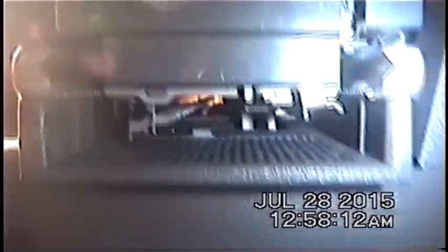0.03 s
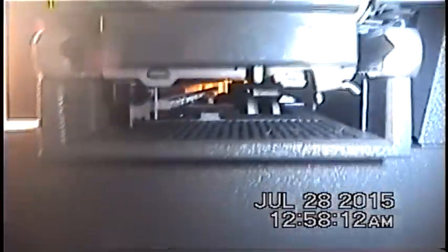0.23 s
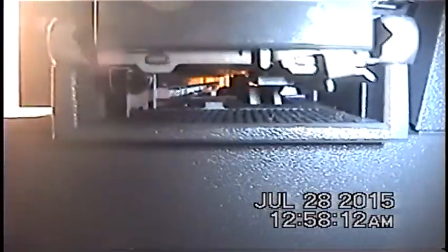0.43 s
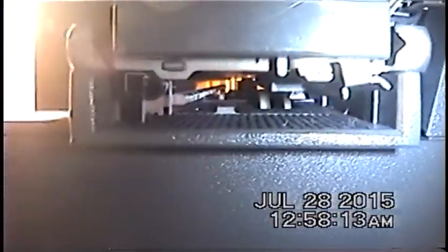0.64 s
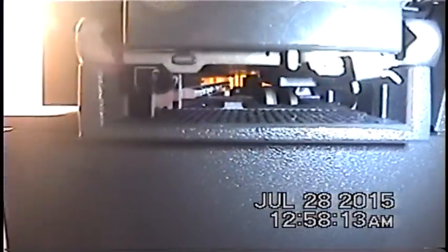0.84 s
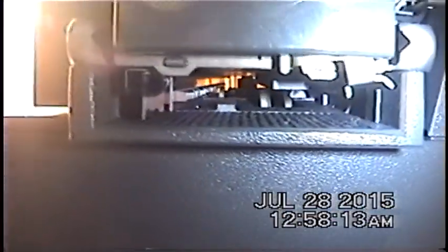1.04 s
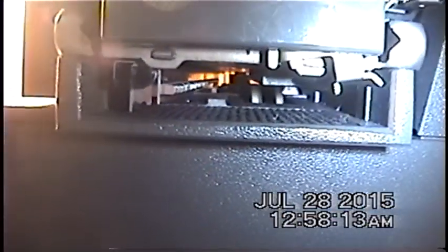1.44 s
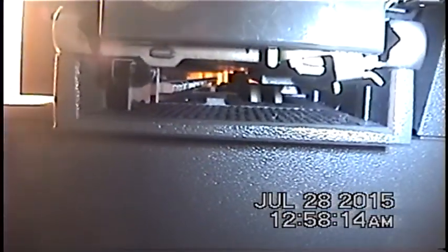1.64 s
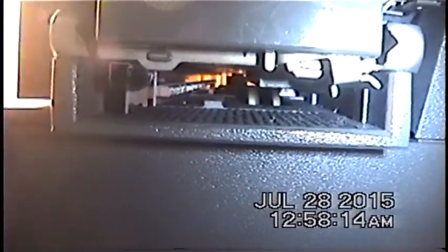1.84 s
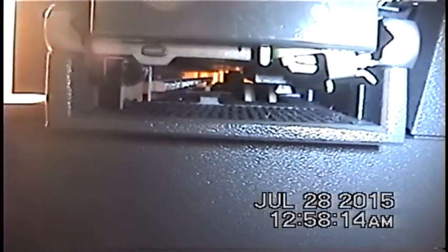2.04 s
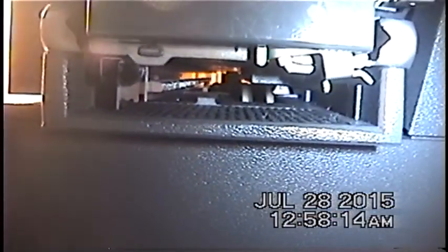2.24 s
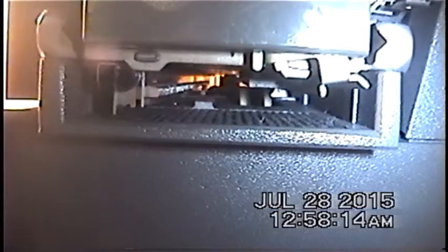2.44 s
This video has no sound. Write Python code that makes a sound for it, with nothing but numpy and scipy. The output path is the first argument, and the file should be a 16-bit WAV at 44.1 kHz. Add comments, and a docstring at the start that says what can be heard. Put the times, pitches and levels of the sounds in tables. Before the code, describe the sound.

A manual typewriter's carriage rattles, rings its bright bell and clacks to a stop.

```python
"""A manual typewriter's carriage rattles along, very close, trips the bell and clacks to a stop.
The steel bell rings on over a knock and a lever's tick. Its first quarter second overloads the camera's
treble-boosted sound channel, which adds sum and difference tones.
The camera's motor hums and whirrs underneath."""
import sys
import numpy as np
from scipy import signal
from scipy.fft import rfft, irfft
from scipy.io import wavfile
from scipy.ndimage import uniform_filter1d

SR = 44100
rng = np.random.default_rng(int(sys.argv[2]) if len(sys.argv) > 2 else 0)


def dump(signal):
    """Clip the signal to [-1, 1] and save it as 16-bit WAV at the path in sys.argv[1]."""
    limited = np.clip(np.atleast_2d(signal).T, -1, 1)
    pcm = np.round(limited * 32767).astype(np.int16)
    wavfile.write(sys.argv[1], SR, pcm)


N = 110250


def carriage():
    """Metal parts strike the frame and ring its modes, over the rail's scrape and a faint low ring."""
    # Each row: start in s, level in dB, treble tilt in dB/octave, t60 in s, ring in dB re the blow.
    clacks = [(.039, -41.5, -6, 0.092, -2.5), (.075, -28, -1.5, 0.037, -3), (.078, -31.5, -1.5, 0.058, 9),
              (.116, -39.5, -5.5, 0.04, 4), (0.1483, -37, -4, .1, 0), (0.167, -32.5, -4, .08, 1),
              (0.1833, -28, -3.5, 0.047, 1), (0.194, -34.5, 0, 0.026, 3.5), (.206, -34.5, -8, 0.13, 6.5),
              (0.2198, -24.5, 2.5, 0.076, -14.5), (0.2231, -10, 2.5, 0.1, -4),
              (.235, -12.5, 4, 0.083, -0.5), (.261, -23, -4, 0.25, -6), (.477, -29, -12, 0.055, -12.5),
              (.492, -13, -1.5, 0.054, -3), (.4985, -14.5, -2.5, 0.074, 0), (.507, -10, 0.5, 0.053, -8),
              (0.5151, -16.5, 2.5, 0.11, -12.5), (0.53, -25, 0.5, .05, -6.5)]
    # Each row: frequency in Hz, relative density in dB.
    frame_colour = [(30, -8.5), (100, -10.5), (250, -6.5), (500, -7.5), (800, -10.5), (1400, -4),
                    (2400, -3), (3300, -0.5), (5000, -3), (7500, -6), (10000, -14.5), (14000, -19)]
    # Each row: frequency in Hz, relative level in dB, t60 in s.
    frame_modes = [(513, -16, 0.1), (649, -28.5, 0.21), (1259, -9.5, 0.12), (1540, -12, 0.096),
                   (2075, -8.5, 0.042), (2243, -12.5, 0.082), (2498, -5, 0.065), (3255, -12, 0.099)]
    # Each row: frequency in Hz, level in dB, t60 in s.
    faint_ring = [(440, -41.5, 0.95)]
    out = slide()
    add(out, 0, ring(faint_ring))
    for start_s, db, tilt_db, t60_s, ring_db in clacks:
        impact = blow(frame_colour, db, t60_s, tilt_db)
        add(out, start_s, impact + amp(db + ring_db) * ring(frame_modes))
    return out


def slide():
    """The carriage scrapes unevenly along its rail."""
    # Each row: frequency in Hz, relative density in dB.
    rail_colour = [(60, -8.5), (330, -0.5), (680, -4), (1000, -1.5), (1500, -3), (2400, -4), (3500, -7.5),
                   (6000, -18.5), (14000, -34.5)]
    start_s, end_s, ramp_s = 0.089, 0.47, 0.022
    level_db, rough_db = -44, 3
    t = np.arange(N) / SR
    moving = np.clip(np.minimum(t - start_s, end_s - t) / ramp_s, 0, 1)
    bumps = uniform_filter1d(rng.standard_normal(N), size=200)
    return moving * amp(level_db + rough_db * bumps / bumps.std()) * noise(rail_colour, N)


def bell():
    """A small steel gong, struck once; its second mode is a beating pair."""
    # Each entry: mode frequency in Hz.
    modes_hz = [3998, 9207, 9174, 14931]
    # Each row: that mode's level in dB, decay in dB/s.
    decays = [(-5.5, 17.5), (-6, 54.5), (-15.5, 57.5), (-13, 70)]
    start_s, rise_s = 0.2235, 0.008
    t = np.maximum(np.arange(N) / SR - start_s, 0)
    tone = sum(amp(db - db_per_s * t) * np.sin(2 * np.pi * hz * t)
               for hz, (db, db_per_s) in zip(modes_hz, decays))
    return tone * (1 - np.exp(-t / rise_s))


def pawl():
    """The escapement pawl catches twice and rings briefly."""
    # Each row: start in s, level in dB.
    catches = [(.456, -14), (0.4621, -15)]
    # Each row: frequency in Hz, relative density in dB.
    colour = [(100, -19), (800, -20), (1500, -6), (2200, -3.5), (3000, -6.5), (5000, -14.5), (7500, -20.5),
              (14000, -36.5)]
    # Each row: frequency in Hz, level in dB re the blow, t60 in s.
    modes = [(1560, -16, 0.083), (2150, 0, 0.038)]
    out = np.zeros(N)
    for start_s, db in catches:
        add(out, start_s, blow(colour, db, t60_s=0.046) + amp(db) * ring(modes))
    return out


def desk():
    """The machine's weight thumps the desk."""
    # Each row: start in s, level in dB.
    thumps = [(0.077, -39.5), (0.224, -27), (.5, -32.5)]
    # Each row: frequency in Hz, relative density in dB.
    colour = [(20, -5.5), (55, -1.5), (110, -6.5), (190, -0.5), (400, -17.5), (1500, -51), (8000, -88)]
    out = np.zeros(N)
    for start_s, db in thumps:
        add(out, start_s, blow(colour, db, t60_s=0.51, rise_s=0.0033))
    return out


def knock():
    """A dry, close knock on a hollow casing."""
    # Each row: frequency in Hz, level in dB, t60 in s.
    casing_modes = [(426, -15.5, 0.021), (480, -26, 0.06), (1340, -39, 0.035)]
    # Each row: frequency in Hz, relative density in dB.
    crack_colour = [(100, -21), (600, -3), (900, 0), (1150, -12), (1700, -5), (2800, -9), (3500, -6),
                    (5800, -2.5), (7500, -25), (13000, -14.5), (15000, -25)]
    crack = blow(crack_colour, db=-20, t60_s=0.012, rise_s=0.0001)
    out = np.zeros(N)
    add(out, start_s=1.2387, sound=ring(casing_modes) + crack)
    return out


def lever():
    """A small lever settles with a tick and one bounce."""
    # Each row: frequency in Hz, relative density in dB.
    colour = [(100, -20), (800, -23), (1250, -14), (1600, -12.5), (2400, 2), (3300, -8.5), (4800, -6),
              (6300, -1.5), (7200, -13), (8300, -13.5), (9500, -33.5), (14000, -36.5)]
    # Each row: frequency in Hz, level in dB re the blow, t60 in s.
    modes = [(1211, -13, .04), (2214, -5, .028), (2496, 2, .028), (6182, -1, .022), (6470, -9, .04)]
    tick_s, tick_db, t60_s = 1.4, -23.5, 0.025
    bounce_delay_s, bounce_db = 0.0028, -25
    out = np.zeros(N)
    add(out, tick_s, blow(colour, tick_db, t60_s) + amp(tick_db) * ring(modes))
    add(out, tick_s + bounce_delay_s, blow(colour, bounce_db, t60_s))
    return out


def room(x):
    """A small room's tail, the treble dying first."""
    # Each row: frequency in Hz, t60 in s.
    decay_times = [(100, 0.33), (500, 0.38), (2000, 0.24), (6000, 0.17), (14000, 0.26)]
    hz, t, spectra = signal.stft(rng.standard_normal(SR // 2), SR, nperseg=256)
    decay = np.exp(-np.log(1000) * t / read(decay_times, hz)[:, None])
    _, tail = signal.istft(spectra * decay, SR)
    return signal.fftconvolve(x, tail / np.linalg.norm(tail))[:N]


def motor():
    """The camera's motor: steady tones, a wavering hum and a pulsing whirr."""
    # Each row: frequency in Hz, rms level in dB.
    steady_tones = [(118.6, -59), (1440, -67), (1557.5, -62)]
    # Each row: time in s, rms level in dB.
    hum_levels = [(0, -49.5), (.6, -45.5), (.85, -47.5), (1.02, -49.5), (1.2, -49), (1.5, -46.5),
                  (1.66, -48), (1.8, -58.5), (2, -64), (2.15, -49.5), (2.28, -46.5), (2.5, -56)]
    # Each row: frequency in Hz, relative density in dB.
    whirr_colour = [(100, -26), (1100, -17.5), (1600, 5), (2200, -4), (2800, -10.5), (4500, -26),
                    (6700, -13), (9000, -30)]
    hum_hz, whirr_hz, whirr_db, sharpness = 57, 121.5, -56, 1.5
    t = np.arange(N) / SR
    tones = sum(amp(db) * np.sin(2 * np.pi * (hz * t + rng.random())) for hz, db in steady_tones)
    hum = amp(np.interp(t, *np.transpose(hum_levels))) * np.sin(2 * np.pi * hum_hz * t)
    pulses = np.exp(sharpness * np.cos(2 * np.pi * whirr_hz * t))
    whirr = noise(whirr_colour, N) * pulses / np.sqrt(np.mean(pulses ** 2))
    return np.sqrt(2) * (tones + hum) + amp(whirr_db) * whirr


def room_noise():
    """Steady, bass-heavy noise of the room."""
    # Each row: frequency in Hz, relative density in dB.
    colour = [(20, 4.5), (60, -9), (130, 1), (220, -2.5), (400, -9.5), (800, -14), (1200, -16.5),
              (1600, -25.5), (2100, -20), (2700, -17.5), (3600, -20.5), (5500, -27.5), (6700, -21),
              (8000, -27), (11000, -31), (14000, -34)]
    return amp(db=-49) * noise(colour, N)


def blow(colour, db, t60_s, tilt_db=0, rise_s=0.00025):
    """One impact: crowded modes that start at once and die together."""
    t = np.arange(SR // 2) / SR
    return amp(db) * noise(colour, len(t), tilt_db) * fade(t, t60_s) * (1 - np.exp(-t / rise_s))


def ring(modes, rise_s=0.00015):
    """Struck modes, each dying at its own rate."""
    t = np.arange(SR // 2) / SR
    tone = sum(amp(db) * fade(t, t60_s) * np.cos(2 * np.pi * hz * t) for hz, db, t60_s in modes)
    return tone * (1 - np.exp(-t / rise_s))


def noise(colour, size, tilt_db=0):
    """Coloured noise of rms 1, tilted by tilt_db per octave above 1 kHz."""
    hz = np.fft.rfftfreq(size, 1 / SR)
    octaves = np.log2(np.maximum(hz, 1000) / 1000)
    magnitude = amp(read(colour, hz) + tilt_db * octaves)
    x = irfft(magnitude * np.exp(2j * np.pi * rng.random(len(hz))), size)
    return x / x.std()


def fade(t, t60_s):
    """Exponential decay, 60 dB in t60_s."""
    return np.exp(-np.log(1000) * t / t60_s)


def amp(db):
    """Decibels to gain."""
    return 10 ** (np.asarray(db) / 20)


def read(points, hz):
    """Interpolates a table on a log-frequency axis."""
    points_hz, values = np.transpose(points)
    return np.interp(np.log(hz + 1), np.log(points_hz + 1), values)


def add(mix, start_s, sound):
    """Mixes a sound in at start_s."""
    part = mix[round(start_s * SR):][:len(sound)]
    part += sound[:len(part)]


def overload(x, bias=0.077, knee=7.7, oversample=4):
    """Lopsided soft clipping at full scale."""
    biased = signal.resample_poly(x, oversample, 1, axis=1) + bias
    clipped = biased / (1 + abs(biased) ** knee) ** (1 / knee)
    return signal.resample_poly(clipped - bias, 1, oversample, axis=1)


def scene():
    """The clatter with its room tail; bell, knock and background stay dry."""
    clatter = carriage() + pawl() + desk() + lever()
    tail = amp(db=-10.5) * room(clatter)
    return (clatter + tail + bell() + knock() + motor() + room_noise())[None]


def record(dry):
    """The camera's channel: treble boost, overload, matching treble cut, band limit."""
    # Each row: frequency in Hz, gain in dB.
    response = [(20, -1.5), (4000, -1), (9200, -1.95), (12000, -0.5), (14400, -7.8), (14930, -28.5),
                (15700, -35)]
    emphasis_hz, ceiling_db, ceiling_at_hz = 1500, -5, 4000
    low_cut_hz, high_cut_hz = 12, 15700
    pole = np.exp(-2 * np.pi * emphasis_hz / SR)
    full_scale = amp(ceiling_db) * abs(1 - pole * np.exp(-2j * np.pi * ceiling_at_hz / SR))
    boosted = signal.lfilter([1, -pole], [full_scale], dry)
    out = signal.lfilter([full_scale], [1, -pole], overload(boosted))
    out = signal.sosfilt(signal.butter(2, low_cut_hz, "high", fs=SR, output="sos"), out)
    hz = np.fft.rfftfreq(2 * N, 1 / SR)
    out = irfft(rfft(out, 2 * N) * amp(read(response, hz)))[:, :N]
    lowpass = signal.firwin(511, high_cut_hz, window=("kaiser", 9), fs=SR)
    return signal.oaconvolve(out, lowpass[None], "same")


dry = scene()
out = record(dry)
dump(out)
```